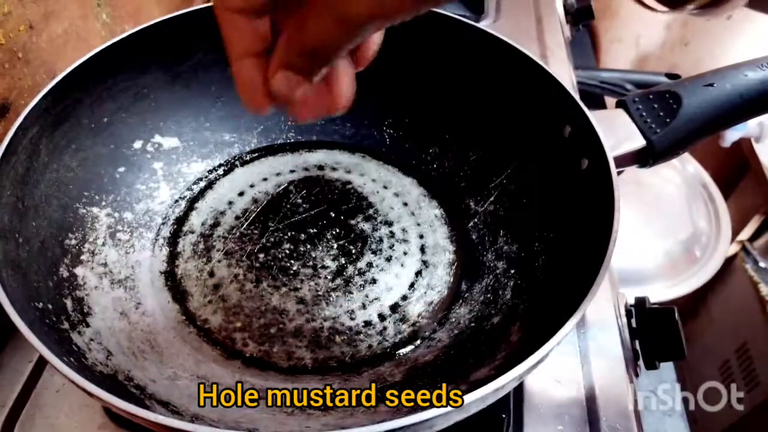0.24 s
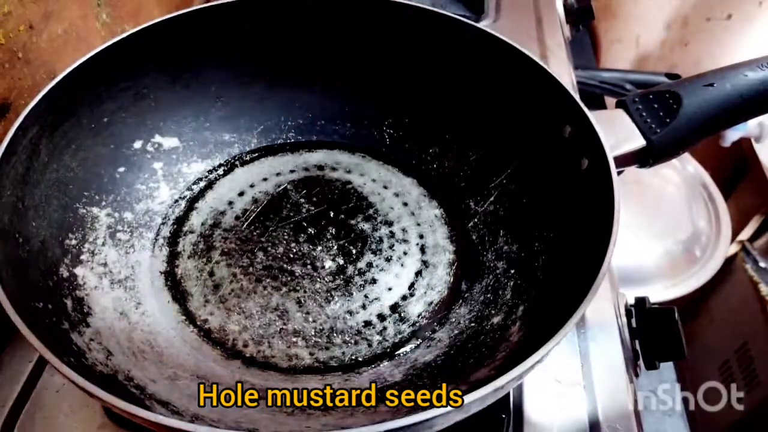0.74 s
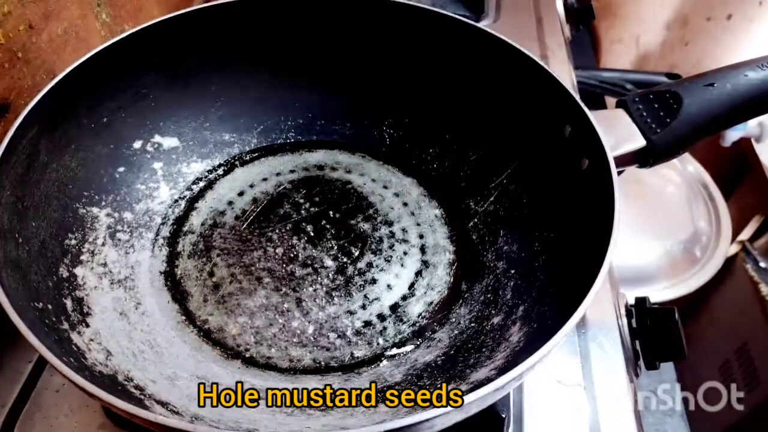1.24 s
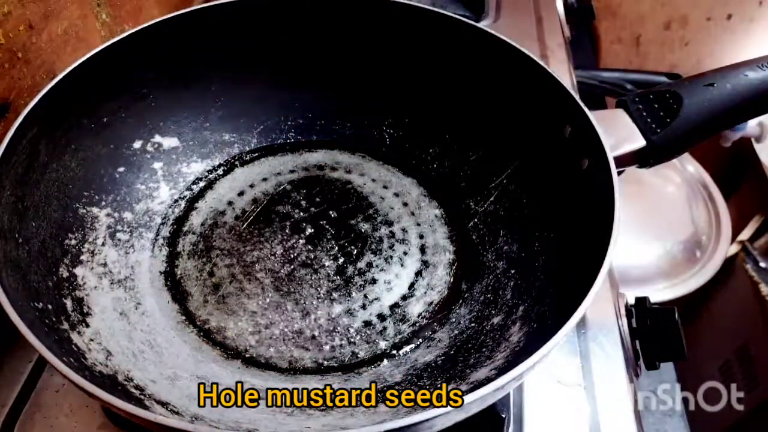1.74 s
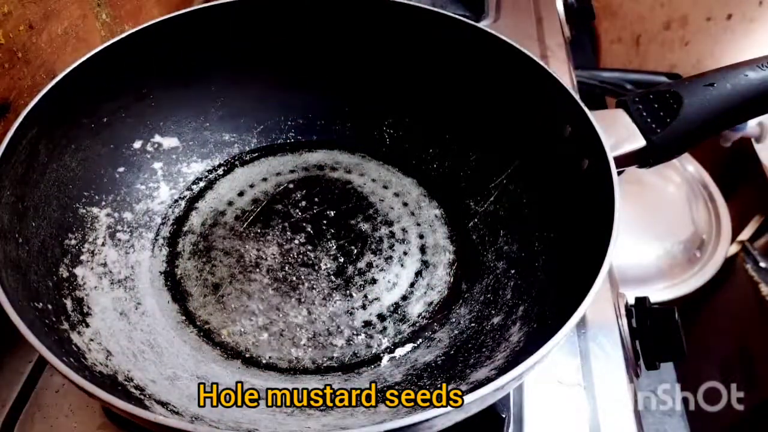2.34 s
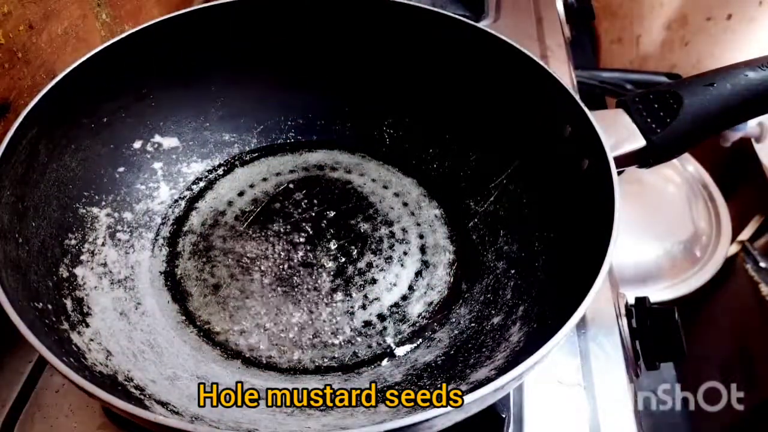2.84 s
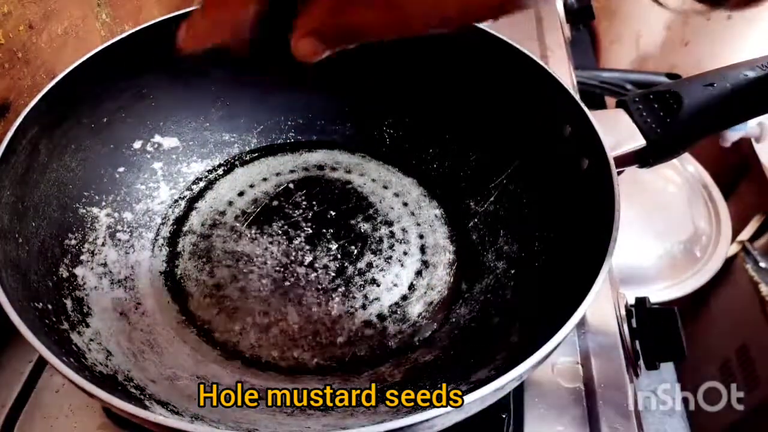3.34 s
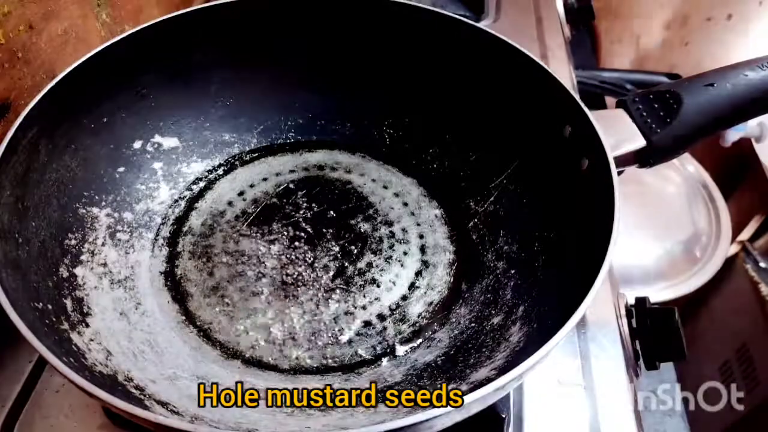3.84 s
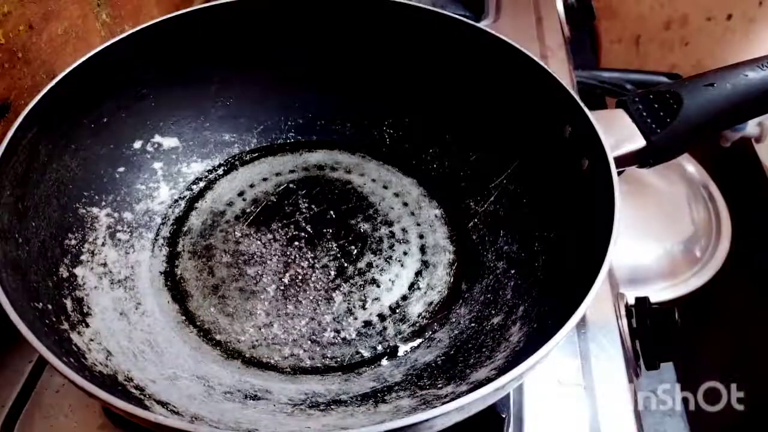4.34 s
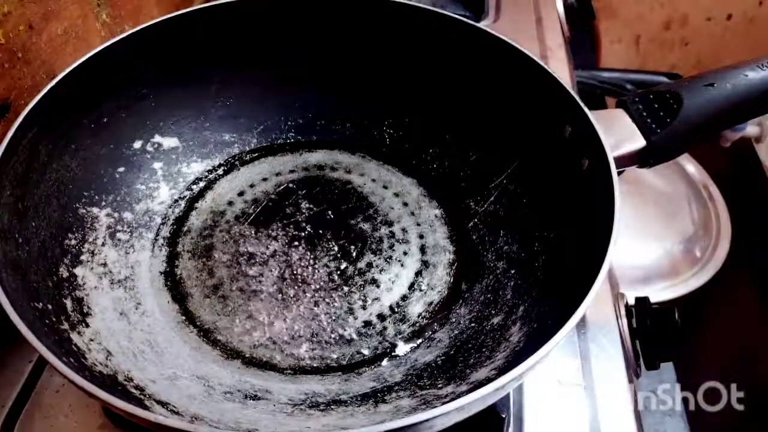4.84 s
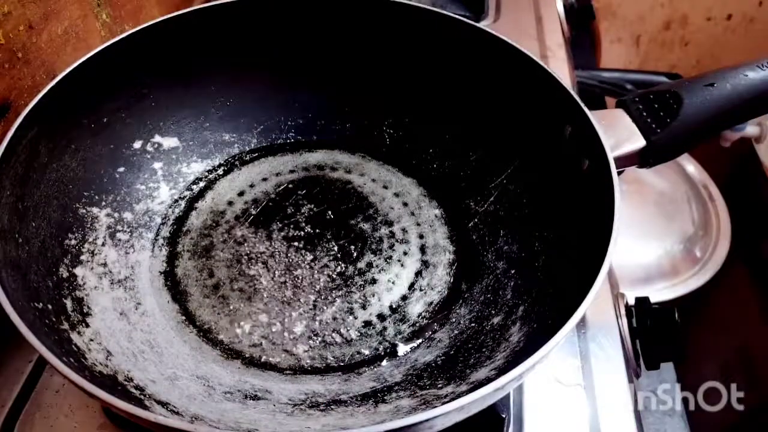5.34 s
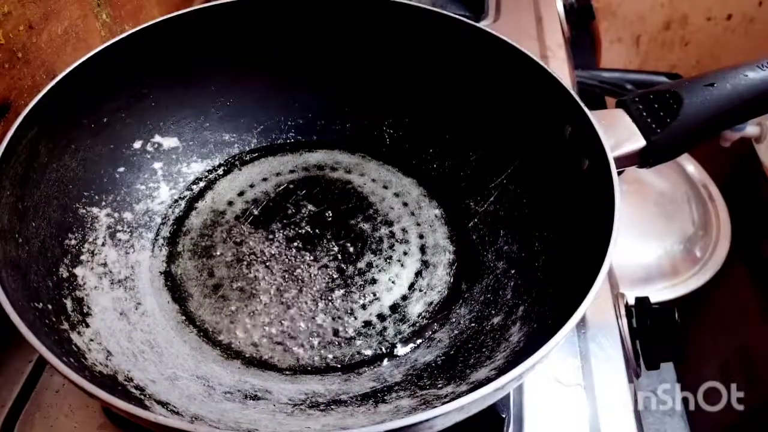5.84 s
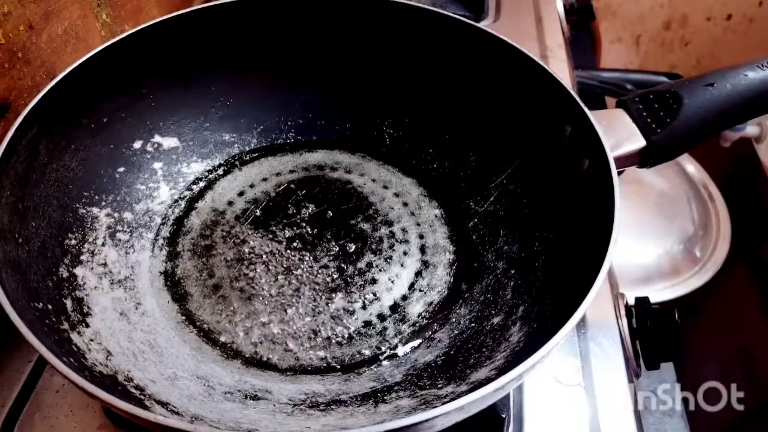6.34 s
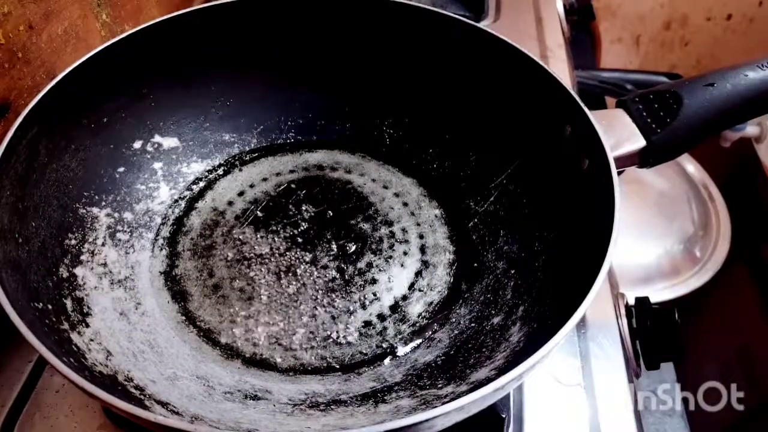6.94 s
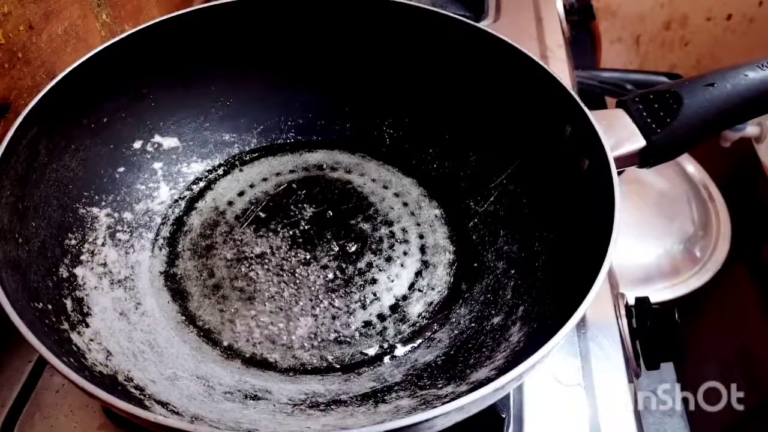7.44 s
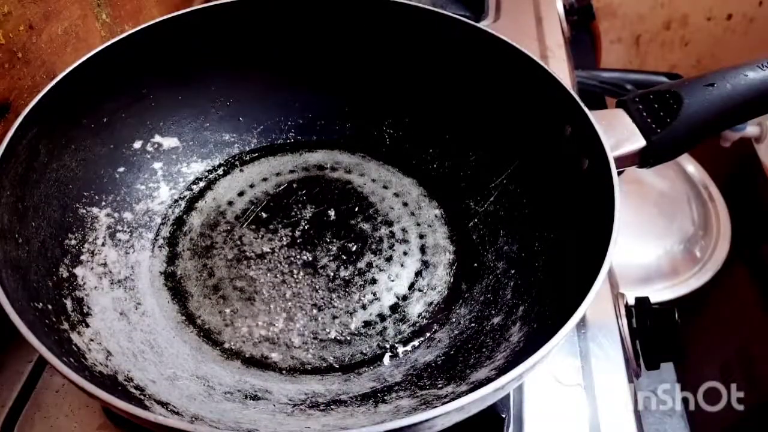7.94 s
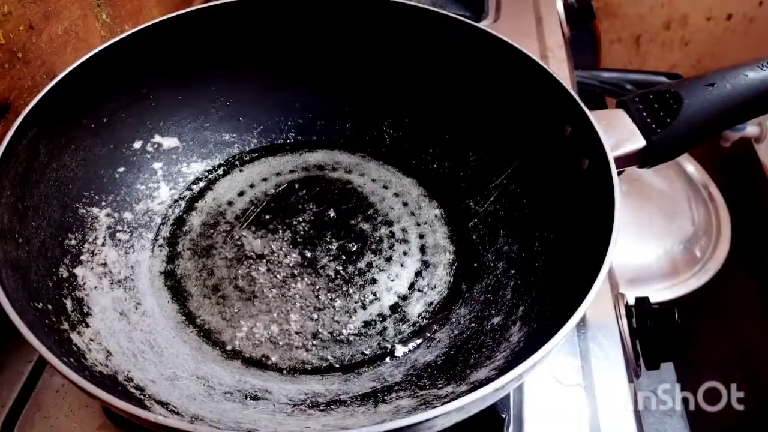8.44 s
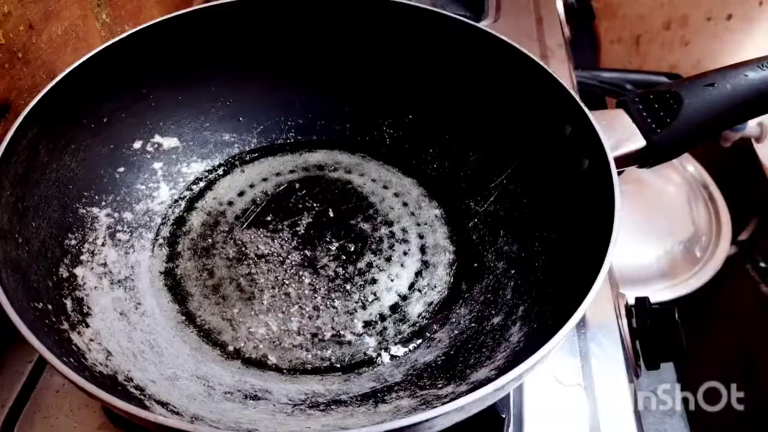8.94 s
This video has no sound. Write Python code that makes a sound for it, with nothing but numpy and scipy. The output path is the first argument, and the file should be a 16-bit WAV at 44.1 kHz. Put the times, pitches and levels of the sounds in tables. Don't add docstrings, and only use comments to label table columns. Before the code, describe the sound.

A close stereo phone pickup hears a quick granular rain of tiny seeds hitting hot oil, then scattered crackles. Sharp clicks ring shortly off the pan wall with a hissy spray of oil. Thin bright sizzling and a slightly throbbing low fan hum continue throughout, dipping briefly after the hardest cracks. Bursts are sparse in the middle and crowded toward the end, peaking before eight seconds.

```python
import sys
import numpy as np
from scipy import signal
from scipy.fft import rfft, irfft, next_fast_len
from scipy.io import wavfile
from scipy.ndimage import uniform_filter1d

SR = 44100
rng = np.random.default_rng(int(sys.argv[2]) if len(sys.argv) > 2 else 0)


def ratio_of_db(decibels):
    return 10 ** (np.asarray(decibels, float) / 20)


def to_wav(sig):
    pcm = np.clip(np.atleast_2d(sig), -1, 1) * 32767
    pcm = np.round(pcm).astype(np.int16)
    wavfile.write(sys.argv[1], SR, pcm.T)


N = 405587

# start_s, crack_peak_db, pan_db, coarse_spray_db, fine_spray_db
BURSTS = [(0.8903, -20, -62, -43.5, -41), (1.003, -20, -70, -38.5, -33), (1.1297, -5.5, -50.5, -38, -38),
          (1.834, -36, -60, -34.5, -42), (2.0567, -9, -53.5, -45, -36), (3.1551, 2, -55, -56, -34),
          (4.7083, -4, -54, -44, -32), (4.7514, -9, -55.5, -46.5, -33.5), (5.554, -14, -53, -62, -44),
          (5.7835, -15.5, -55, -56, -43), (5.896, -22, -56, -53, -40), (6.005, -3, -58, -50, -34.5),
          (6.312, -14, -55.5, -41, -41), (6.478, -5, -49.5, -35.5, -34), (6.7185, -6, -54, -48, -33.5),
          (7.0126, -11.5, -55, -43.5, -31.5), (7.4749, -9, -60.5, -54, -31.5), (7.5944, -25, -54, -44, -43),
          (7.6769, -0.5, -58, -49, -33), (7.712, 4.5, -48, -40.5, -25.5),
          (8.1305, -15, -58.5, -51.5, -38.5), (8.277, -22.5, -61, -63, -39), (8.348, -15, -58.5, -53, -38),
          (8.4284, -3.5, -58, -46, -31.5)]
# start_s, crack_peak_db, pan_floor_db, pan_ring_db, spray_db
DROWNED = [(1.1991, -16.5, -40.5, -36.5, -45), (2.1392, -36, -33, -35, -34), (2.2896, -32, -32, -36.5, -30),
           (2.432, -18, -44, -34, -41), (2.6942, -19, -54, -38, -39.5), (3.377, -47, -56, -57, -60),
           (3.4027, -34, -46.5, -42.5, -49), (3.4454, -24, -47.5, -40, -49),
           (3.911, -20, -43.5, -37.5, -51), (4.6683, -19, -41, -30, -37.5),
           (5.0546, -10.5, -44.5, -43, -36.5), (5.8068, -18, -35.5, -44, -44),
           (7.1916, -33, -48.5, -38, -44)]
# start_s, crack_peak_db, coarse_spray_db, fine_spray_db
LANDINGS = [(.012, -33, -51, -36), (.027, -30, -63, -37), (.071, -32, -56, -38.5), (.095, -38, -67, -43),
            (.195, -36, -62, -43.5), (0.687, -40, -48, -47), (0.0503, -31, -73, -35.5),
            (.155, -32, -70, -35.5), (.234, -33, -61, -57), (.2522, -38, -58, -45), (.328, -35, -75, -42.5),
            (.349, -33, -63, -47), (.3903, -26, -55, -41.5), (0.4323, -37, -58, -44),
            (.4757, -38, -54, -56), (.531, -26, -71, -39), (.551, -22, -48.5, -36.5),
            (.583, -34, -38.5, -33), (0.613, -19, -46, -39), (.6327, -32, -42, -32.5),
            (.7615, -41, -61, -50), (0.8, -21, -49, -45), (.814, -28, -43.5, -39.5), (3.237, -42, -69, -49),
            (3.3132, -24, -50, -64), (3.3547, -37, -77, -45), (3.4948, -20, -63, -44.5),
            (3.5528, -41, -58, -45.5), (3.5768, -29, -63, -51)]
# start_s, crack_peak_db,
# coarse_spray_db, fine_spray_db
FAINT_TICKS = [(1.08, -33, -44, -61), (1.4241, -31, -72, -49), (1.505, -36, -64, -46), (1.5677, -31, -74, -52),
               (1.6383, -36, -68, -49), (1.9489, -43, -61, -54), (3.087, -45, -51.5, -56),
               (4.0476, -23, -60, -41), (4.237, -28, -62, -40), (6.1755, -49, -78, -52), (6.429, -39.5, -70, -50),
               (6.9583, -30, -55.5, -59), (7.1246, -42, -51.5, -46), (7.451, -30, -62, -53),
               (7.7853, -17, -58, -43), (8.014, -34, -74, -59), (8.572, -18.5, -50.5, -46),
               (8.6173, -47, -67, -65), (8.9659, -13.5, -49.5, -35.5)]
# low_edge_hz, high_edge_hz, t60_s, crack_colour_db, second_port_db
TAIL_BANDS = [
    (1050, 4440, 0.17, 0, 2),
    (2705, 3700, 0.11, 4, 6.5),
    (4620, 7400, 0.085, 8.5, 10.5),
    (7580, 11100, .11, 6.5, 3.5),
]
# pitch_hz, level_db, t60_s
PAN_MODES = [(1380, 7, 0.13), (2050, 10, 0.052), (2320, 7, 0.095), (2730, -1.5, 0.074), (3100, -25, 0.04),
             (3440, -12.5, .11), (3500, -34, 0.11), (3680, 8, 0.26), (4100, 6, 0.038)]
# delay_ms, level_db
WALL_ECHOES = [(.75, -13), (1.25, -12), (2.65, -10), (3.05, -12), (5.4, -17), (7.8, -16)]
# frequency_hz, level_db
SEED_COLOUR = [(500, -0.5), (5000, 0.5), (8500, 0), (10800, 4), (13000, 2.5), (15700, -1.5), (18000, 6)]
# start_s, peak_db, pitch_hz, t60_s
BUBBLES = [(1.1987, -22, 2780, 0.015), (2.138, -22, 2830, 0.028), (2.2893, -19, 2920, 0.02),
           (2.4313, -27.5, 3800, 0.016), (2.6938, -22.5, 3660, 0.037), (3.4042, -41, 3340, 0.026),
           (3.4447, -31.5, 2900, 0.028), (3.9105, -28, 3580, 0.016), (4.668, -23.5, 3460, 0.021),
           (5.0533, -36, 3850, 0.014), (5.8062, -20, 2260, 0.024), (7.1921, -27.5, 3650, 0.017),
           (8.013, -55, 1630, 0.024), (8.6188, -46.5, 3730, 0.02)]
# start_s, peak_db, pitch_hz, t60_s
THUMPS = [(3.155, -19, 990, 0.0022), (4.708, -35.5, 1130, 0.005), (6.003, -31, 840, 0.0045),
          (6.478, -46, 721, 0.0044), (6.717, -41, 864, 0.0068), (7.011, -56, 1370, 0.0033),
          (7.675, -40, 1460, 0.0037), (7.711, -33.5, 1390, 0.011), (8.129, -46, 1370, 0.0075),
          (8.427, -49, 840, 0.005), (8.964, -38.5, 860, 0.0046)]
# start_s, peak_db, pitch_hz, t60_s
KNOCKS = [(.02, -49.5, 895, 0.67), (.55, -44.5, 815, 0.21), (5.809, -46, 937, 0.17),
          (8.022, -53.5, 1120, 0.052), (9.165, -56, 685, 0.12)]
# start_s, peak_db, pitch_hz, t60_s
SNAPS = [(.889, -22.5, 4280, 0.009), (1.002, -23, 4100, 0.007), (1.129, -23, 4300, 0.0049)]
# start_s, level_db, hold_s, fall_db_per_s, rim_db
HANDFULS = [(0, -31, 0.0028, 390, 4), (0.146, -45.5, .003, 97, 8), (0.54, -39, 0.078, 140, -5),
            (0.807, -41, 0.022, 341, -2), (3.236, -44.5, 0.265, 600, -6), (3.55, -50, .003, 240, -12)]
# pitch_hz, width_hz, level_db
RIM_RING = [(815, 58, -20), (876, 22, -12)]
# frequency_hz, level_db_per_hz
SIZZLE_COLOUR = [(1200, -19.5), (2500, -24), (3600, -16), (6000, -11.5), (8500, -8), (10800, -4.5),
                 (13000, -15), (15700, -28)]
# start_s,
# sizzle_re_hum_db
HEAT = [(0, 6.5), (.28, -26), (.4, -9), (.69, -5), (.9, -8), (1.15, -3), (3.1, -0.8), (6, -2.5),
        (7.3, -3.5), (9.2, -3.5)]
# pitch_hz, level_db
FAN_LINES = [(147.3, -18.5), (173.7, -11), (196.4, 2), (343.7, -19.5), (392.7, -15.5), (781.8, -9.5),
             (1368, -23.5)]
# frequency_hz, level_db_per_hz
FAN_AIR = [(30, -14), (60, -10), (100, 4), (200, -1), (400, 0), (850, 2.5), (1250, -4.5), (1700, -4),
           (3000, -5.5), (6000, -10)]
# start_s, depth_db
DUCKS = [(1.13, 5), (1.835, 1.5), (3.156, 12.5), (3.47, 11), (3.912, 5), (4.75, 4), (6.006, 7), (6.48, 6),
         (6.72, 8.5), (7.013, 6.5), (7.192, 4.5), (7.712, 15), (8.13, 10), (8.43, 13.5), (8.966, 8)]
# frequency_hz, level_re_first_port_db
SECOND_PORT = [(2500, 0), (7500, 0.5), (10000, 3.5), (12500, 7), (16000, 7)]


def bursts(size=6144):
    t = np.arange(size) / SR
    spray, cracks = np.zeros((2, N + size)), np.zeros(N + size)
    rise_s = [.0003, .0003, .001, .0015]
    shapes = []
    for (_, _, t60, _, _), rise in zip(TAIL_BANDS, rise_s):
        late_room = ratio_of_db(-18.5) * decay(t, 0.36)
        fall = decay(t, t60) + 1.1 * decay(t, 0.012) + late_room
        shapes.append(fall * (1 - np.exp(-t / rise)))
    reach = np.array([[1, ratio_of_db(db)] for *_, db in TAIL_BANDS])
    rows = seeds()
    lumps = ratio_of_db(1.8 * walk(900, len(rows) * size)).reshape(-1, size)
    noise = np.array([unit(band(ports(lumps.shape, 0.17) * lumps, lo, hi)) for lo, hi, *_ in TAIL_BANDS])
    floor = 0
    for k, (s, crack_db, *tail_db) in enumerate(rows):
        gain = ratio_of_db(np.array(tail_db) - 3.0)
        sound = np.einsum("b,bt,bct,bc->ct", gain, np.array(shapes), noise[:, :, k], reach)
        chance = rng.standard_normal((len(PAN_MODES), 3))
        for (hz, db, t60), (detune, vary, turn) in zip(PAN_MODES, chance):
            struck = gain[floor] * ratio_of_db(db - 11.0 + vary) * reach[floor][:, None]
            phase = 2 * np.pi * hz * (1 + 0.025 * detune) * t + 3 * turn
            sound += struck * decay(t, t60) * np.sin(phase)
        i = int(s * SR)
        spray[:, i:i + size] += sound
        cracks[i:i + size] += ratio_of_db(crack_db + 1.5) * crack(tail_db, size)
    return colour(spray[:, :N], SEED_COLOUR) + cracks[:N]


def seeds():
    small = []
    for s, db, coarse, fine in LANDINGS + FAINT_TICKS:
        quiet_pan = max(coarse, fine) - 27.5
        small.append((s, db, quiet_pan, quiet_pan, coarse, fine))
    surface = [(s, db, pan + 1.5, pan, coarse, fine) for s, db, pan, coarse, fine in BURSTS]
    under = [(s, db, low, ring, fine + 0.35 * (ring - fine) - 2, fine) for s, db, low, ring, fine in DROWNED]
    return small + surface + under


def crack(tail_db, size):
    hz = np.fft.rfftfreq(size, 1 / SR)
    points = []
    for (lo, hi, _, extra_db, _), db in zip(TAIL_BANDS, tail_db):
        points.append((np.sqrt(lo * hi), .5 * db + extra_db))
    below = [(100, points[0][1] - 20), (600, points[0][1] - 2)]
    points = below + points + [(15500, points[-1][1] - 8)]
    cepstrum = irfft(np.log(response(points, hz) * response(SEED_COLOUR, hz)), size)
    cepstrum[1:size // 2] *= 2
    cepstrum[size // 2 + 1:] = 0
    click = irfft(np.exp(rfft(cepstrum)), size)
    return wall(click / np.abs(click).max())


def wall(x):
    echoes = sum(-ratio_of_db(db) * np.roll(x, int(ms * SR / 1000)) for ms, db in WALL_ECHOES)
    return x + band(echoes, 900, 12500)


def bubbles(table, boost_db, second_db, bowl_db, size=8192):
    t = np.arange(size) / SR
    out = np.zeros(N + size)
    for s, peak_db, hz, t60 in table:
        i = int((s + .001) * SR)
        out[i:i + size] += ratio_of_db(peak_db + boost_db) * decay(t, t60) * np.sin(2 * np.pi * hz * t)
    bowl = ratio_of_db(bowl_db) * rng.standard_normal(size) * decay(t, 0.12)
    bowl[0] = 1
    return signal.oaconvolve(out, bowl)[:N] * np.array([[1], [ratio_of_db(second_db)]])


def sprinkle(t):
    falls = []
    for s, db, hold, fall, _ in HANDFULS:
        falls.append(ratio_of_db(db - 7.5 - fall * np.maximum(t - s - hold, 0)) * (t >= s))
    shake = sum(ratio_of_db(row[-1]) * g for row, g in zip(HANDFULS, falls))
    patter = unit(colour(band(grains(500, 3.0, .06), 3800, 15000), SEED_COLOUR))
    rim = 0
    for hz, width, db in RIM_RING:
        rim = rim + ratio_of_db(db) * unit(band(rng.standard_normal(N), hz - width / 2, hz + width / 2))
    return sum(falls) * patter + uniform_filter1d(shake, 2000) * rim


def sizzle():
    hiss = unit(ports((N,), 0.11)) * ratio_of_db(0.76 * walk(10, N))
    return unit(colour(0.26 * grains(400, 2.36, .03) + hiss, SIZZLE_COLOUR))


def fan(t):
    lines = 0
    for hz, db in FAN_LINES:
        level = ratio_of_db(db + 1.5 + 1.34 * walk(6, N))
        phase = 2 * np.pi * hz * t + 0.17 * walk(3.01, N) + 6 * rng.random()
        lines = lines + level * np.sin(phase)
    air = unit(colour(ports((N,), 0.18) * ratio_of_db(walk(5, N)), FAN_AIR))
    return lines + ratio_of_db(-1.5) * air


def throb(t):
    mains_hz, mains_db, rotor_hz, rotor_db, sway_rad = 100.2, -10, 103.5, -11, 2.33
    wander = sway_rad * uniform_filter1d(walk(2.5, N), size=4000)
    rotor = ratio_of_db(rotor_db + 3.3 * walk(2, N)) * np.sin(2 * np.pi * rotor_hz * t + wander)
    return ratio_of_db(mains_db + 1.5) * np.sin(2 * np.pi * mains_hz * t) + ratio_of_db(2.5) * rotor


def ducking(t):
    duck_s, recover_db_per_s = 0.035, 10.5
    dips = [np.minimum((t - s) / duck_s * db, db - recover_db_per_s * (t - s)) for s, db in DUCKS]
    return -np.maximum(np.max(dips, axis=0), 0)


def grains(rate, spread_db, smear_s):
    ticks = (rng.random(N) < rate / SR) * ratio_of_db(spread_db * rng.exponential(size=N))
    t = np.arange(2048) / SR
    tail = rng.standard_normal(2048) * (decay(t, smear_s) * 1.5 + decay(t, 0.004))
    return unit(signal.oaconvolve(ticks * rng.choice([-1, 1], N), tail)[:N])


def ports(shape, apart):
    return rng.standard_normal(shape) + apart * rng.standard_normal((2,) + shape)


def walk(rate, size):
    k = max(int(SR / rate), 1)
    held = np.repeat(rng.standard_normal(size // k + 1), k)
    return 0.9 * uniform_filter1d(held, k)[:size]


def decay(t, t60):
    return np.exp(-np.log(1000) * t / t60)


def unit(x):
    return x / np.sqrt(np.mean(x ** 2, axis=-1, keepdims=True))


def response(points, hz):
    f, db = np.transpose(points)
    return ratio_of_db(np.interp(np.log(hz + 1), np.log(f), db))


def colour(x, points):
    size = next_fast_len(N)
    return irfft(rfft(x, size) * response(points, np.fft.rfftfreq(size, 1 / SR)), size)[..., :N]


def band(x, lo_hz, hi_hz):
    return signal.sosfilt(signal.butter(2, [lo_hz, hi_hz], "band", fs=SR, output="sos"), x)


def scene():
    t = np.arange(N) / SR
    rings = bubbles(BUBBLES, 0.56, -0.88, -25)
    rings = rings + band(bubbles(THUMPS, 2.5, 0, -56), 390, 4700)
    rings = rings + bubbles(KNOCKS, 0, -1.4, -36) + bubbles(SNAPS, 0, -1.8, -23.5)
    seed_sound = band(rings + bursts(), 150, 20000)
    sizzle_db = np.interp(t, *np.transpose(HEAT)) + 5.5
    steady = fan(t) + throb(t) + ratio_of_db(sizzle_db) * sizzle()
    hum_db = -53.5
    return seed_sound + sprinkle(t) + ratio_of_db(hum_db + ducking(t)) * steady


def low_pass(x):
    return signal.sosfilt(signal.butter(12, 17320, fs=SR, output="sos"), x)


def record(dry):
    port_lead_ms, cross_ms, cross_share, right_db = 0.019, 0.4082, 0.68, 3
    size = next_fast_len(N)
    hz = np.fft.rfftfreq(size, 1 / SR)
    first, second = rfft(dry, size)
    second = second * response(SECOND_PORT, hz) * np.exp(2j * np.pi * hz * port_lead_ms / 1000)
    cycles = hz * cross_ms / 1000
    late = cross_share * np.exp(-2j * np.pi * cycles)
    lift = 1 / np.abs(1 - cross_share * np.exp(-2j * np.pi * np.minimum(cycles, .5)))
    left = (first - late * second) / ratio_of_db(right_db / 2)
    right = (second - late * first) * ratio_of_db(right_db / 2)
    mix = irfft(np.array([left, right]) * lift, size)[:, :N]
    mix = signal.sosfilt(signal.ellip(8, .2, 16, 15850, fs=SR, output="sos"), mix)
    mix = np.clip(mix, -.95, .95)
    mix = signal.sosfilt(signal.ellip(6, .2, 60, 17100, fs=SR, output="sos"), mix)
    return low_pass(mix)


dry = scene()
out = record(dry)
to_wav(out)
```